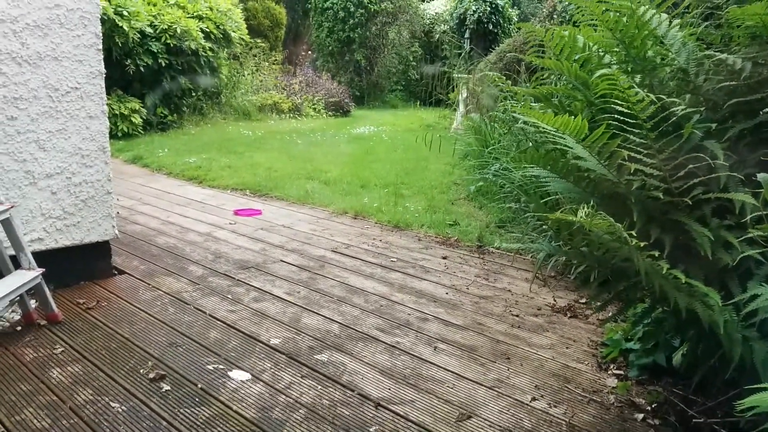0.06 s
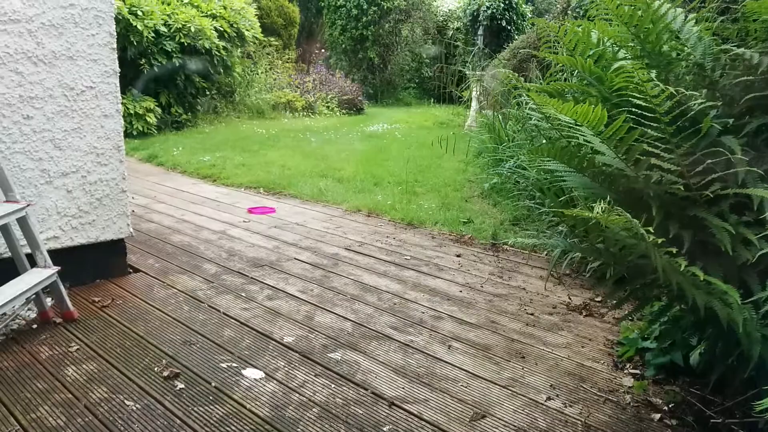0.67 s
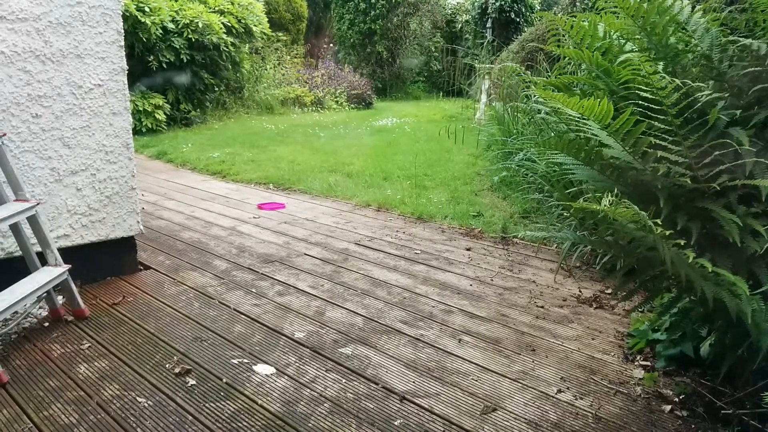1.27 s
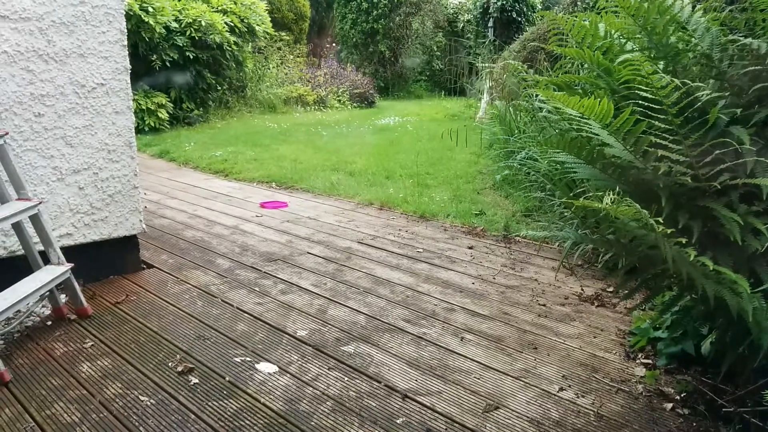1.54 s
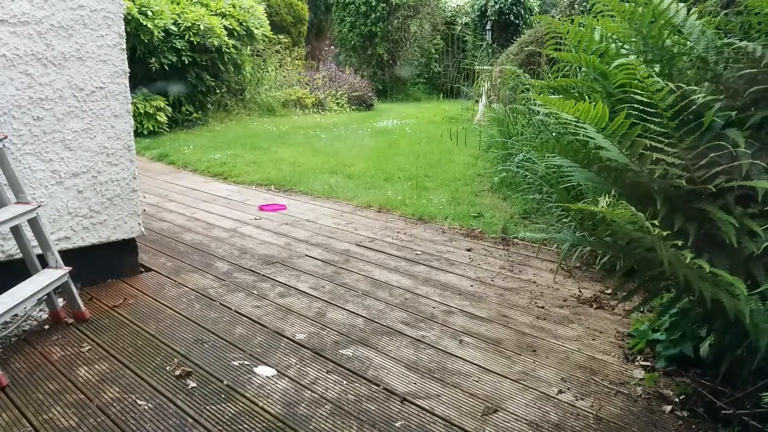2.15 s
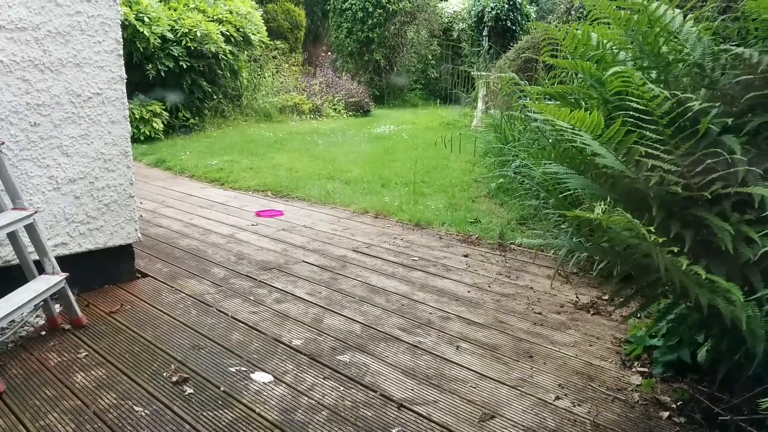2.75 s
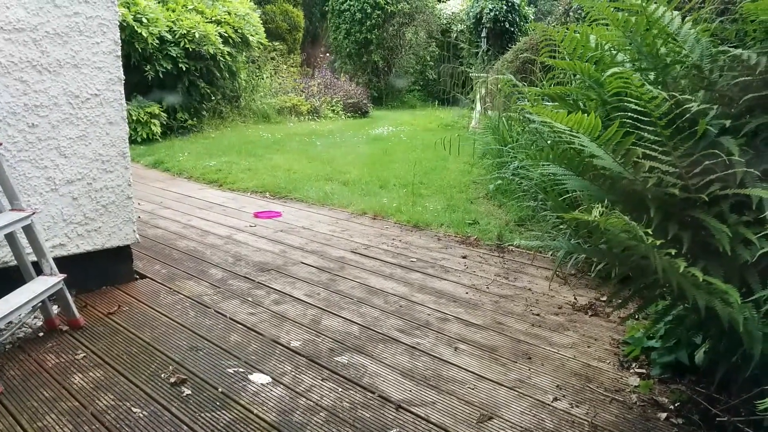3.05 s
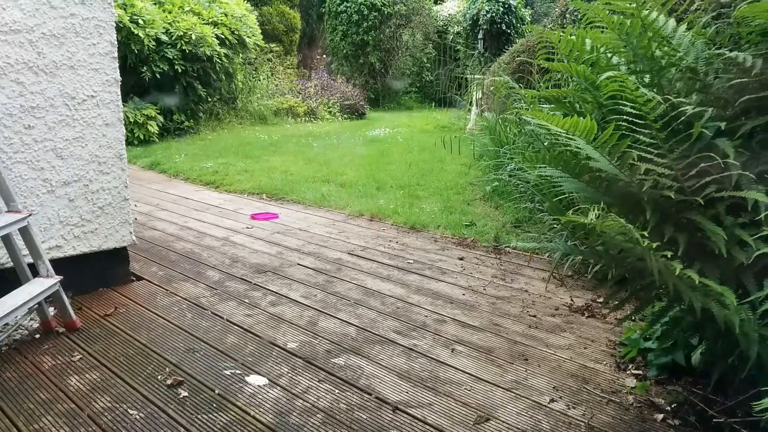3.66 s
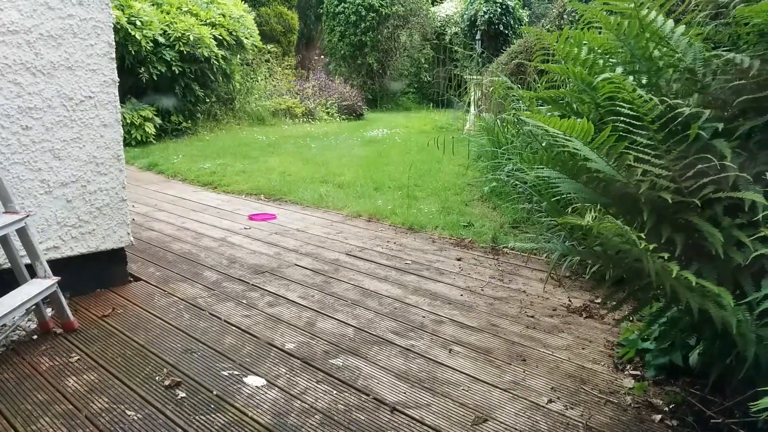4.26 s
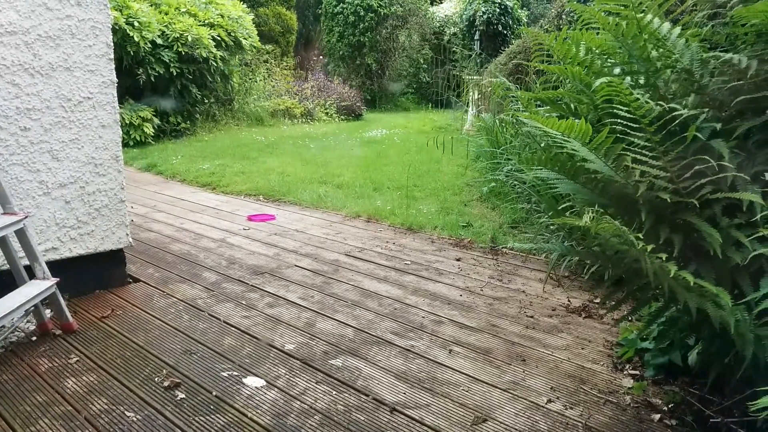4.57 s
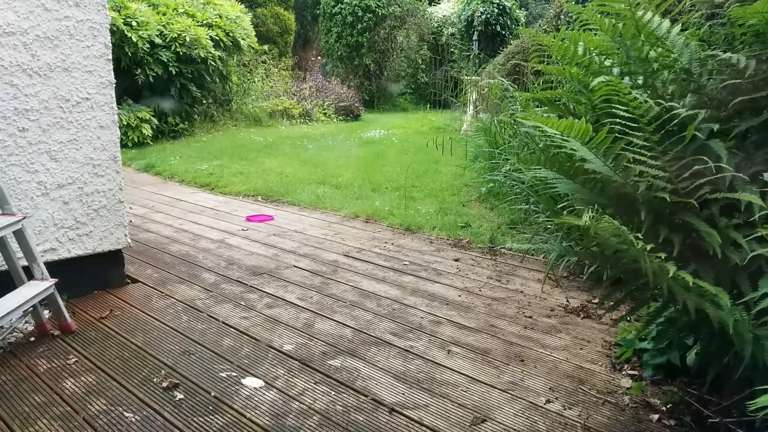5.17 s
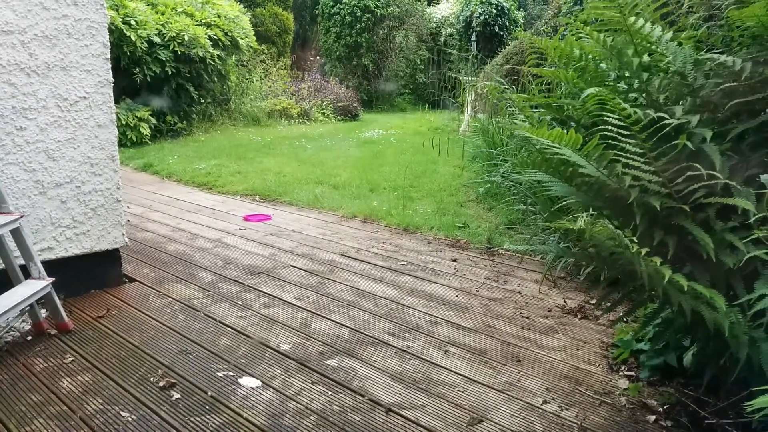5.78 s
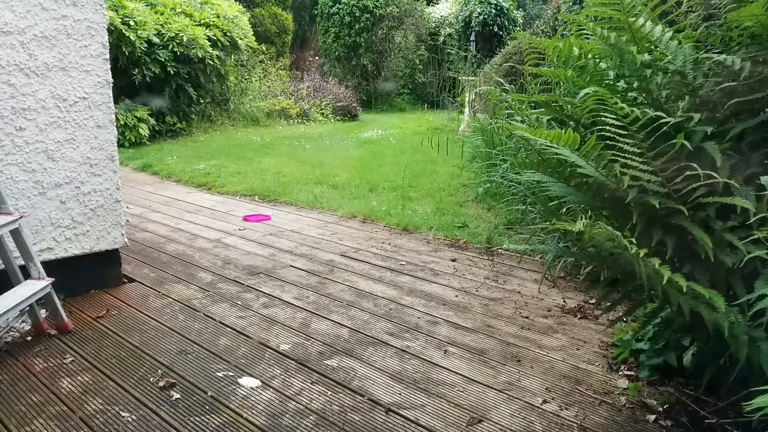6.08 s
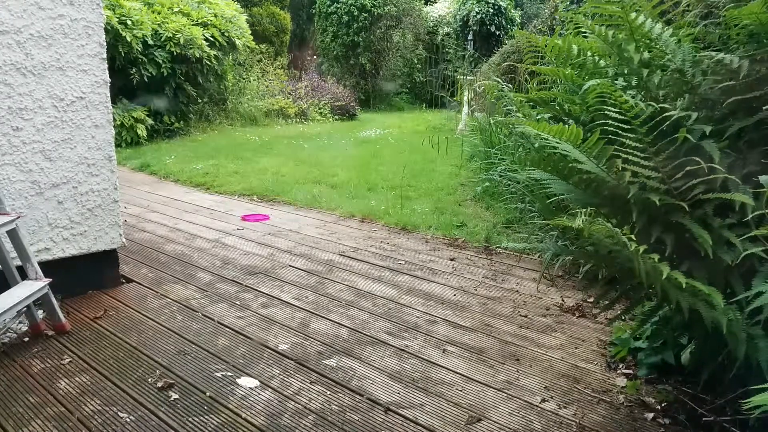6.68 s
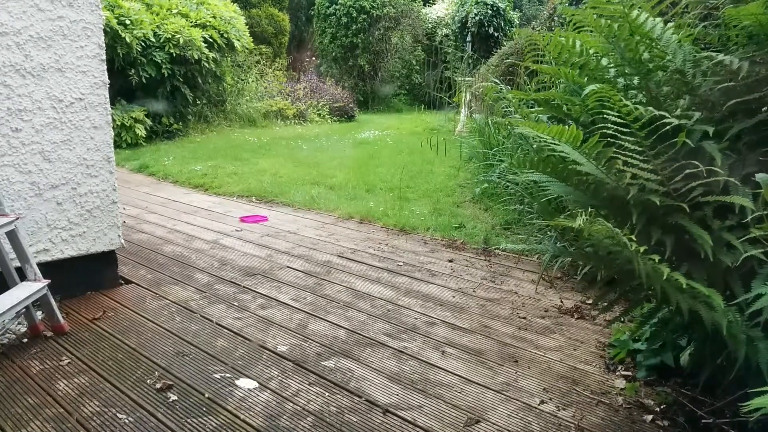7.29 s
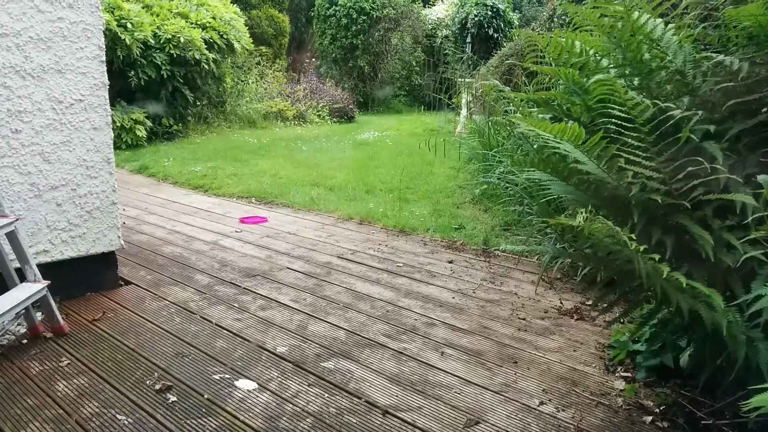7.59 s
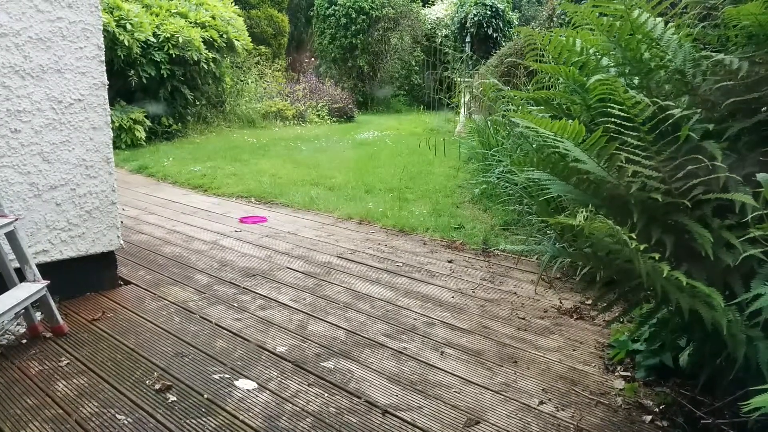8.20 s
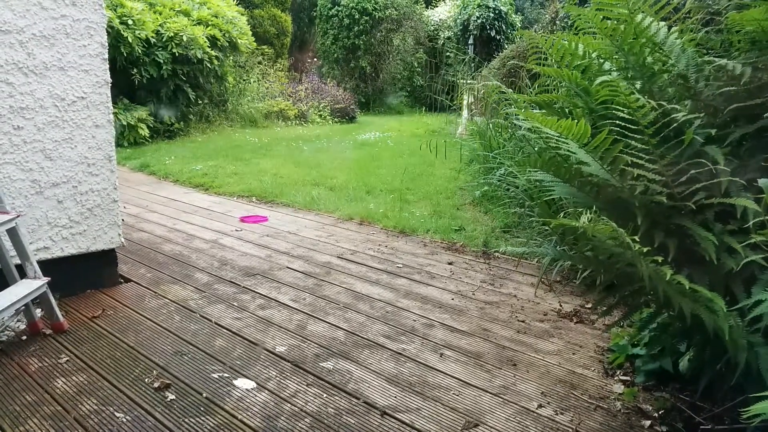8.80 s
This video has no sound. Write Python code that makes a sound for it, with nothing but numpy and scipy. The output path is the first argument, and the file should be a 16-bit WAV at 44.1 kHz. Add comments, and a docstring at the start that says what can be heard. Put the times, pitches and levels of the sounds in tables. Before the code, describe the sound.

Faint outdoor air in a quiet garden runs for about nine seconds: a soft hiss, a distant wavering low drone and a deep rumble, all fluttering together in short, uneven swells. Close on the microphone, a hand shifts on the camera. Two sharp knocks with low thumps open the sound, and a finger rubs briefly across the case until 0.3 seconds. A low hum swells three times, sagging slightly in pitch, and is gone just before 1 second. A click comes at 0.5 seconds and a quick cluster around 1 second. Lighter clicks follow near 2 seconds, then several between 3.3 and 3.8, many with a soft thump and tiny creaks as the grip settles. After faint taps at 4.7 and 5.6 seconds, a louder knock lands at 5.9. Only the faint background remains until two small taps near 8.9 seconds.

```python
"""The air of a quiet garden, heard through a hand-held camera above a wooden deck.
Its hiss, a faint far drone and a low rumble come and go together in short swells.
The grip knocks the camera case, each knock a click and a thump, then settles with tiny creaks.
At the start a finger sticks and slips across the case, and a low hum swells and fades."""
import sys
import numpy as np
from scipy import signal
from scipy.fft import rfft, irfft
from scipy.io import wavfile
from scipy.ndimage import uniform_filter1d

SR = 44100
rng = np.random.default_rng(int(sys.argv[2]) if len(sys.argv) > 2 else 0)


def dump(signal):
    """Clip the signal to [-1, 1] and save it as 16-bit WAV at the path in sys.argv[1]."""
    limited = np.clip(np.atleast_2d(signal).T, -1, 1)
    pcm = np.round(limited * 32767).astype(np.int16)
    wavfile.write(sys.argv[1], SR, pcm)


N = 398663
TIME = np.arange(N) / SR
CEILING_DB = -59.5  # the top of the background's level ride


def amp(db):
    """Decibels to gain."""
    return 10 ** (np.asarray(db) / 20)


def unit_rms(x):
    """Scales to rms 1."""
    return x / np.sqrt(np.mean(x ** 2) + 1e-20)


def automation(points):
    """Breakpoints joined by straight lines in time."""
    return np.interp(TIME, *np.transpose(points))


def eq_db(points, hz):
    """An EQ curve in dB, joined on a log-frequency axis."""
    f, db = np.transpose(points)
    return np.interp(np.log(hz + 1), np.log(f + 1), db)


def colour(x, points):
    """Runs x through an EQ curve, at rms 1."""
    gain = amp(eq_db(points, np.fft.rfftfreq(N, 1 / SR)))
    return unit_rms(irfft(rfft(x) * gain, N))


def wavering_tone(hz, width_hz):
    """Noise in one resonance, at rms 1."""
    detune = (np.fft.rfftfreq(N, 1 / SR) - hz) / width_hz
    return unit_rms(irfft(rfft(rng.standard_normal(N)) / (1 + detune ** 2), N))


def steadied(x, size=1500):
    """Evens out the slow swells of a noise."""
    return x / np.sqrt(uniform_filter1d(uniform_filter1d(x ** 2, size), size) + 1e-3)


def add(mix, s, sound):
    """Mixes a sound in at time s."""
    part = mix[max(round(s * SR), 0):][:len(sound)]
    part += sound[:len(part)]


def flutter(jumps_per_s=22, sag_s=0.064):
    """A quick random wobble that jumps up and sags back, at rms 1."""
    rate = jumps_per_s * np.exp(.5 * wavering_tone(hz=9.93, width_hz=9.66))
    jumps = np.diff(np.floor(np.cumsum(rate) / SR), prepend=0)
    saw = signal.lfilter([1], [1, -np.exp(-1 / (sag_s * SR))], jumps)
    centred = saw - uniform_filter1d(saw, size=3000)
    return unit_rms(uniform_filter1d(centred, size=400))


# Swells of the background. Each row: start in seconds, length in seconds, level in dB before shaping.
SWELLS = [(0.0, 0.62, -58.5), (0.653, 0.26, -59.5), (0.947, 0.23, -61.0), (1.224, 0.077, -59),
          (1.348, 0.34, -64.0), (1.681, 0.12, -65.5), (1.829, 0.45, -62.0), (2.352, 0.072, -68),
          (2.477, 0.094, -70), (2.63, 0.0069, -69), (2.776, 0.14, -68.5), (3.03, 0.011, -67.5),
          (3.102, 0.1, -69.5), (3.29, 0.07, -64.5), (3.416, 0.066, -68.0), (3.568, 0.11, -62.5),
          (3.746, 0.073, -60), (3.903, 0.054, -71.5), (3.994, 0.1, -67.5), (4.26, 0.14, -77.5),
          (4.447, 0.042, -66.0), (4.562, 0.05, -67), (4.666, 0.064, -65.5), (4.768, 0.1, -78),
          (4.929, 0.0082, -67), (5.017, 0.076, -64), (5.133, 0.087, -70), (5.307, 0.085, -64),
          (5.397, 0.083, -72), (5.635, 0.03, -62.5), (5.7, 0.11, -68.0), (5.877, 0.09, -62),
          (6.115, 0.049, -62.5), (6.225, 0.088, -68), (6.363, 0.024, -70), (6.559, 0.17, -61),
          (6.786, 0.29, -63), (7.154, 0.054, -68), (7.261, 0.17, -64.5), (7.454, 0.082, -64),
          (7.577, 0.05, -62), (7.717, 0.064, -64.5), (7.81, 0.033, -66.5), (7.98, 0.01, -71.5),
          (8.123, 0.079, -62.5), (8.267, 0.12, -65.5), (8.486, 0.05, -74), (8.624, 0.088, -69.5),
          (8.776, 0.095, -72.5), (8.906, 0.044, -63.5), (9.018, 0.036, -71.5)]


def level_ride(open_db_per_s=628, close_db_per_s=384, arch_db=2.5, flutter_db=2.0,
               lull_db=-81.5, lull_flutter_db=4.0, floor_db=-83):
    """The background's fader in dB: swells open fast and close slower, over a fluttering lull."""
    power = np.zeros(N)
    for start, length, db in SWELLS:
        t = np.arange(max(-.06, -start), length + .1, 1 / SR)
        edges_db = open_db_per_s * np.maximum(-t, 0) + close_db_per_s * np.maximum(t - length, 0)
        crest_db = arch_db * (np.sin(np.pi * np.clip(t / length, 0, 1)) - .5)
        add(power, start + t[0], amp(db + crest_db - edges_db) ** 2)
    swell_db = 10 * np.log10(power + 1e-14)
    unsteady = np.clip((CEILING_DB - swell_db) / 6, 0.72, 1)  # loud swells flutter less
    swell = amp(swell_db + flutter_db * unsteady * flutter())
    lull = amp(lull_db + lull_flutter_db * flutter())
    return np.clip(20 * np.log10(np.hypot(swell, lull)), floor_db, CEILING_DB)


# The colour of the far wash and hiss. Each row: frequency in Hz, relative level in dB.
AIR_EQ = [(60, -2), (200, 18), (270, 24.5), (315, 13), (375, 4.5), (480, 14.5), (700, 10.5), (1100, 7.5),
          (2000, 4), (4000, 2), (8000, .5), (15500, 0)]
# Faint tones in the wash. Each row: pitch in Hz, width in Hz, level in dB relative to the ride.
AIR_TONES = [(372.2, 25.7, 0.5), (434, 20, -6.5), (717, 4.4, -12)]


def garden_air(ride_db, wash_db=6.5):
    """A bed of far wash and hiss with faint tones in it, all following the ride."""
    wash = amp(wash_db) * colour(rng.standard_normal(N), AIR_EQ)
    tones = sum(amp(db) * wavering_tone(hz, width_hz) for hz, width_hz, db in AIR_TONES)
    return amp(ride_db) * (wash + tones)


# The far drone. Each row: time in seconds, level in dB with the ride at its ceiling.
DRONE_LEVEL = [(0, -53.5), (.85, -46.5), (1.25, -42), (2.0, -45), (3.5, -42), (5.2, -42), (6.9, -40),
               (9, -41.5)]


def far_drone(ride_db, swing=1.69):
    """A low, wavering note that swings further than the hiss with each swell."""
    tone = steadied(wavering_tone(hz=157.7, width_hz=5.9))
    return amp(automation(DRONE_LEVEL) + swing * (ride_db - CEILING_DB)) * tone


# The colour of the rumble. Each row: frequency in Hz, relative level in dB.
RUMBLE_EQ = [(12, -54), (25, -30), (40, -2.5), (64, 3.5), (85, -4), (120, -8), (190, -19), (300, -24),
             (600, -64)]
# Extra rumble as the hand settles on the camera. Each row: time in seconds, boost in dB.
HANDLING_BOOST = [(.02, 22), (.11, 19.5), (.17, 10.5), (.25, 4), (.8, 1), (1.0, 6), (1.6, 7), (2.2, 10.5),
                  (2.35, 2), (5.8, 1.5), (7, -1), (9, 0.5)]


def rumble(ride_db, base_db=-47, swing=1.23):
    """Deep noise that follows the swells, heaviest while the hand settles."""
    noise = steadied(colour(rng.standard_normal(N), RUMBLE_EQ))
    return amp(base_db + automation(HANDLING_BOOST) + swing * (ride_db - CEILING_DB)) * noise


# The colour of the struck camera case. Each row: frequency in Hz, relative level in dB.
STRUCK_CASE_EQ = [(30, -7.5), (100, 15.5), (330, 8), (480, 8), (650, -1.5), (880, 3), (1150, -1.5),
                  (1450, -0.5), (1800, -4.5), (2200, -3), (3400, -7), (8000, -11.5), (15000, -20)]


def case_click(tilt_db, spot_hz, edge_hz, fall_db, spot_db=5, spot_octaves=0.17,
               echo=0.17, echo_s=.00027):
    """One impulse through the case; the touched spot adds a resonance, the far side a quick echo."""
    hz = np.fft.rfftfreq(4096, 1 / SR)
    db = eq_db(STRUCK_CASE_EQ, hz) + tilt_db * np.log2(np.clip(hz, 300, 8000) / 1000)
    db += spot_db * np.exp(-(np.log2((hz + 1) / spot_hz) / spot_octaves) ** 2)
    db -= fall_db * np.interp(hz / edge_hz, [.85, 1.15], [0, 1])  # a soft contact excites little treble
    db += 20 * np.log10(abs(1 + echo * np.exp(-2j * np.pi * hz * echo_s)))
    log_gain = np.log(amp(np.r_[db, db[-2:0:-1]]))
    minimum_phase = np.exp(np.conj(signal.hilbert(log_gain)))  # puts the attack at the front
    pulse = irfft(minimum_phase[:len(hz)])
    return pulse / abs(pulse).max()


# Knocks of the grip. Each row: start in seconds, click level in dB, thump level in dB, treble tilt in
# dB per octave, resonance of the spot in Hz, treble edge in Hz, fall above that edge in dB.
GRIP_KNOCKS = [(0.0246, -17, -15.5, -2, 1090, 3570, 21), (0.0773, -14.5, -15.5, -1, 640, 2680, 30),
               (0.4805, -23.5, -49, -1.5, 1430, 4180, 4), (.542, -39, -50, -5, 810, 1500, 10),
               (.594, -36.5, -52, -16.5, 286, 1000, 11), (.942, -26.5, -29.5, 1.5, 814, 4410, 7),
               (1.02, -27.5, -28.5, -0.5, 1370, 1980, 8), (1.041, -32.5, -52, -5.5, 950, 1200, 8),
               (1.1007, -20.5, -21.5, 0, 340, 3870, 21), (1.1414, -26.5, -46, -1.5, 1320, 3380, 9),
               (1.8311, -23, -34, 1.5, 1040, 2680, 17.5), (1.9736, -26, -42, 1, 895, 2790, 17),
               (2.188, -30.5, -39, 0, 430, 2450, 23), (3.2927, -20, -28, 1, 332, 4250, 8.5),
               (3.6278, -26.5, -41, -2, 695, 3630, 5), (3.752, -26, -26.5, -2, 580, 3420, 1.5),
               (3.79, -37, -37, 2, 1900, 2500, 9), (4.725, -38.5, -60, -0.5, 504, 1200, 20),
               (5.6262, -31, -32.5, 1.5, 1300, 2170, 10), (5.922, -13.5, -22.5, 1, 138, 3890, 22),
               (8.89, -43, -27, -18, 198, 600, 15), (8.928, -34, -39.5, 1, 890, 2400, 12)]


def grip_knocks(thump_hz=67, thump_t60=0.086, thump_delay_s=0.00466, ring_db=-18, ring_t60=0.018,
                rebound_s=0.00171, rebound_gain=0.27, rebound_tilt_db=-7):
    """Each knock clicks the case, rebounds more dully, rings briefly and rocks the camera in the hand."""
    out = np.zeros(N)
    t = np.arange(SR // 4) / SR
    thump = np.sin(2 * np.pi * thump_hz * t) * amp(-60 * t / thump_t60)
    for start, click_db, thump_db, tilt_db, spot_hz, edge_hz, fall_db in GRIP_KNOCKS:
        click = case_click(tilt_db, spot_hz, edge_hz, fall_db)
        rebound = -rebound_gain * case_click(tilt_db + rebound_tilt_db, spot_hz, edge_hz, fall_db)
        fade_db = -60 * t / ring_t60 * max(spot_hz / 900, 1)  # higher spots die sooner
        ring = amp(ring_db + fade_db) * np.sin(2 * np.pi * spot_hz * t)
        add(out, start, amp(click_db) * click)
        add(out, start, amp(click_db) * ring)
        add(out, start + rebound_s, amp(click_db) * rebound)
        add(out, start + thump_delay_s, amp(thump_db) * thump)
    return out


def grip_creaks(ride_db, tick_db=-40, spread_db=3, ticks_per_s=45, settle_s=.07, spots=5):
    """After each knock the grip settles with a few tiny ticks, which fade with the background."""
    rate = sum(ticks_per_s * np.exp(-abs(TIME - s) / settle_s) * (TIME > s) for s, *_ in GRIP_KNOCKS)
    out = np.zeros(N)
    for spot_hz in np.geomspace(500, 1900, spots):
        triggers = rng.random(N) < rate / spots / SR
        ticks = triggers * amp(tick_db + spread_db * rng.standard_normal(N))
        out += signal.oaconvolve(ticks, case_click(0, spot_hz, edge_hz=1900, fall_db=11))[:N]
    return out * amp(ride_db - CEILING_DB)


# The finger's stroke. Each row: time in seconds, level in dB before the treble tilt.
SLIDE_LEVEL = [(.03, -50.5), (.08, -33), (.12, -31.5), (.135, -27.5), (.175, -31), (.205, -35.5),
               (.225, -44), (.27, -65)]
# The colour of the rubbed case. Each row: frequency in Hz, relative level in dB.
RUBBED_CASE_EQ = [(30, -5), (120, 12), (250, 6), (500, 0.5), (800, 2.5), (1050, -1.5), (1400, 0.5),
                  (1850, -6.5), (3200, -11.5), (4200, -21), (7500, -30), (15000, -42)]


def finger_slide(slips_per_s=3800, top_tilt_db=2.07, tilt_per_db=0.41):
    """Skin sticks and slips on the case; faster sliding is louder and brighter."""
    db = automation(SLIDE_LEVEL)
    tilt_db = top_tilt_db + tilt_per_db * (db - db.max())  # dB per octave
    slips = rng.standard_normal(N) * (rng.random(N) < slips_per_s / SR)
    hz, frame_s, spectra = signal.stft(colour(slips, RUBBED_CASE_EQ), SR, nperseg=256)
    octaves = np.log2(np.clip(hz, 300, 12000) / 1000)
    brightness = amp(octaves[:, None] * np.interp(frame_s, TIME, tilt_db))
    rub = signal.istft(spectra * brightness, SR)[1][:N]
    touching = (TIME > SLIDE_LEVEL[0][0]) & (TIME < SLIDE_LEVEL[-1][0])
    return touching * amp(db) * rub


# The hum's envelope. Each row: time in seconds, level in dB.
HUM_LEVEL = [(.2, -43), (.285, -31), (.325, -52), (.365, -32), (.5, -31), (.58, -37), (.62, -59.5),
             (.69, -39), (.82, -38.5), (.93, -51)]


def low_hum(start_hz=71.5, sag_hz_per_s=7.1):
    """A low sine tone that swells three times while its pitch sags."""
    start, end = HUM_LEVEL[0][0], HUM_LEVEL[-1][0]
    hz = start_hz - sag_hz_per_s * (TIME - start)
    tone = np.sqrt(2) * np.sin(2 * np.pi * np.cumsum(hz) / SR)
    sounding = (TIME > start) & (TIME < end)
    return sounding * amp(automation(HUM_LEVEL)) * tone


def scene():
    """The garden bed, the hand on the camera and the hum, in mono."""
    ride_db = level_ride()
    bed = garden_air(ride_db) + far_drone(ride_db) + rumble(ride_db)
    hand = grip_knocks() + grip_creaks(ride_db) + finger_slide()
    return (bed + hand + low_hum())[None]


def record(dry, low_cut_hz=33, high_cut_hz=15750):
    """The microphone's bass roll-off and the camera's band limit."""
    low_cut = signal.butter(4, low_cut_hz, "high", fs=SR, output="sos")
    high_cut = signal.firwin(511, high_cut_hz, window=("kaiser", 9), fs=SR)
    return signal.oaconvolve(signal.sosfilt(low_cut, dry), high_cut[None], "same")


dry = scene()
out = record(dry)
dump(out)
```